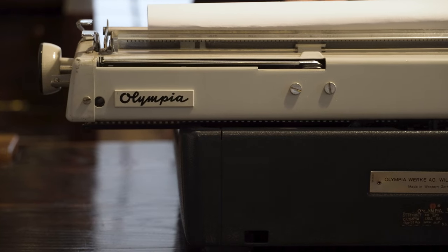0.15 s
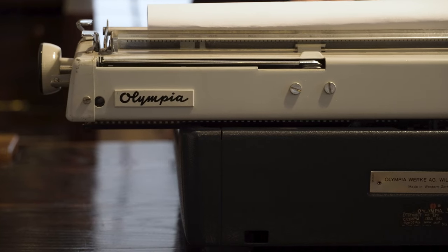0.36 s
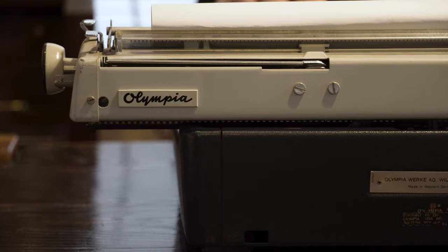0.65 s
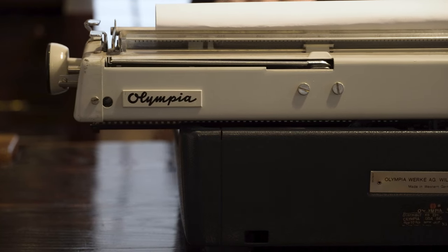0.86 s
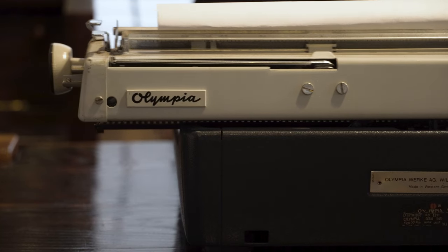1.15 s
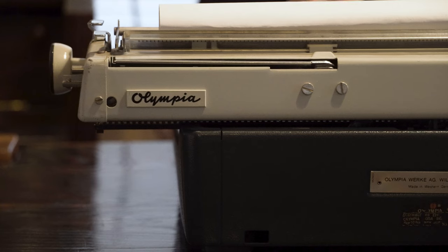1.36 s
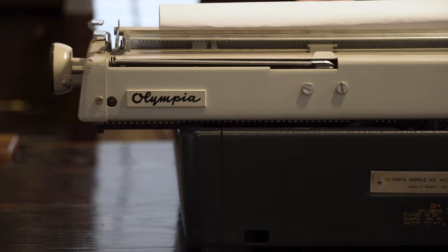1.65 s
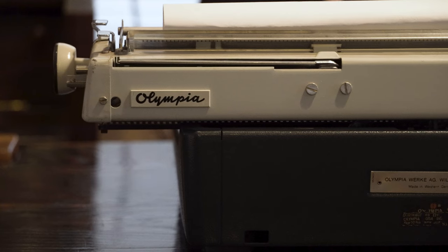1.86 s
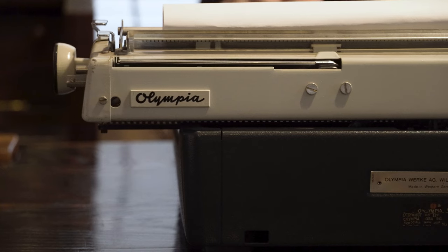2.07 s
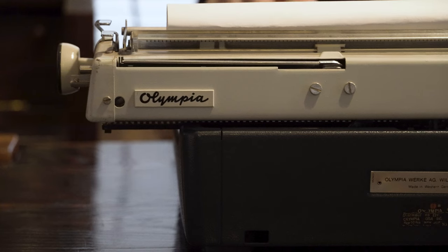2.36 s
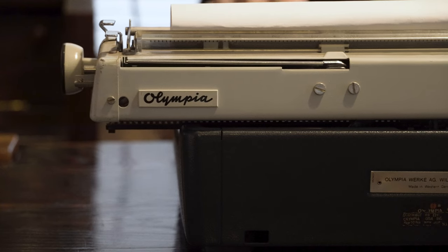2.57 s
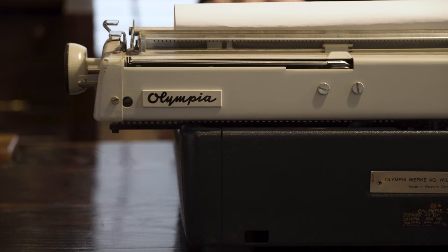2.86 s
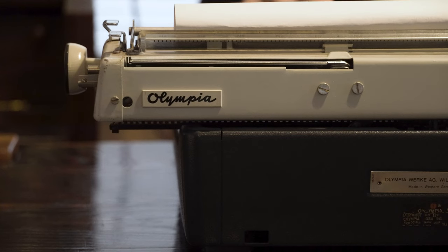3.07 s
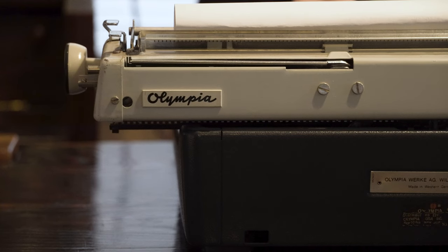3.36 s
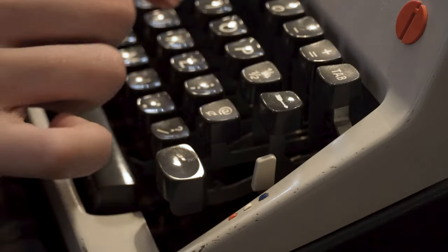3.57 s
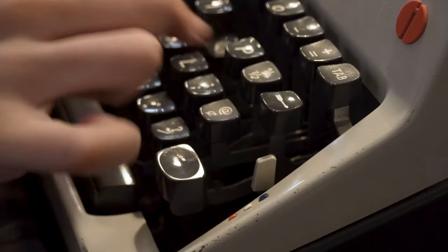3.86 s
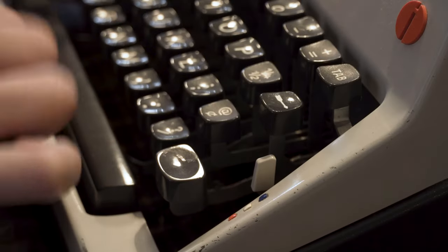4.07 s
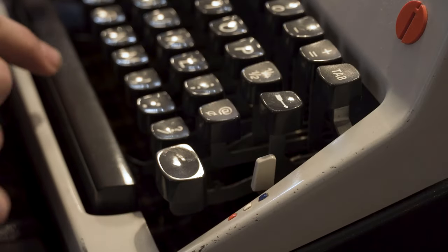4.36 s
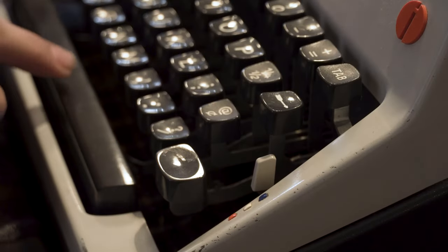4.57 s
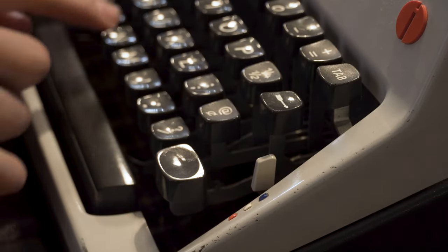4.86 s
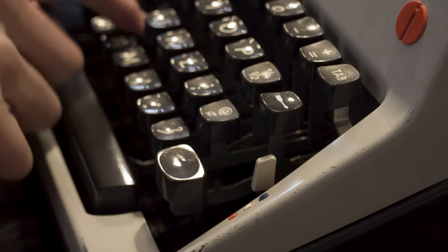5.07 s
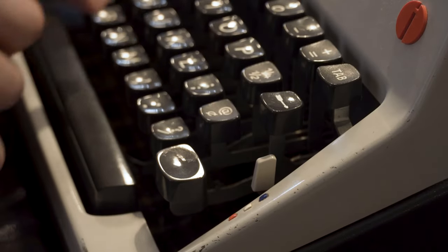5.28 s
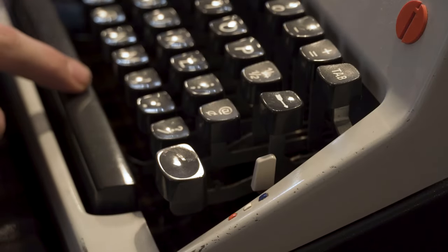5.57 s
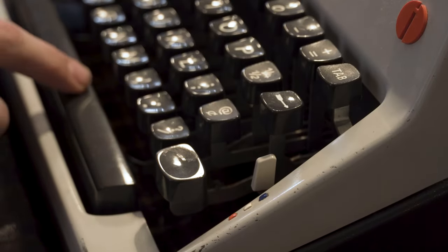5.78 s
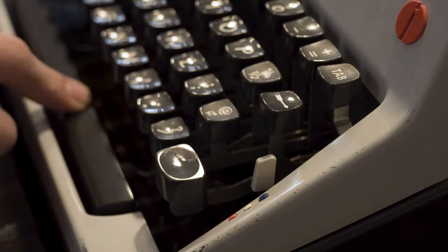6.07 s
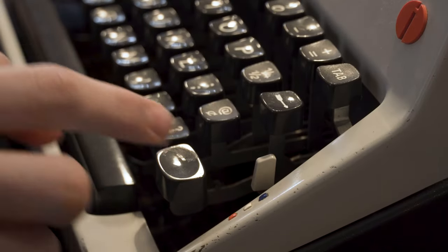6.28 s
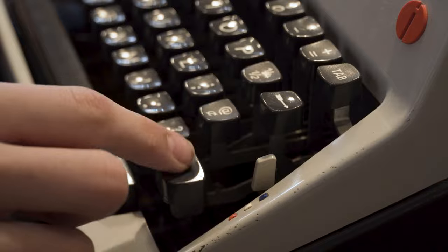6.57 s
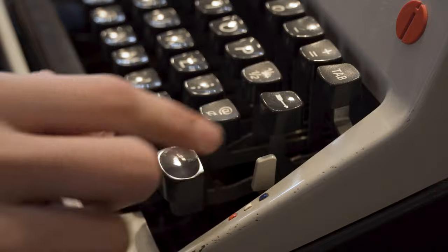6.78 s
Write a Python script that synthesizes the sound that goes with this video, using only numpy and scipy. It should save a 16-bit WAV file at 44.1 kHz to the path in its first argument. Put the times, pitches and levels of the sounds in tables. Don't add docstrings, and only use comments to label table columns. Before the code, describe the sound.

Steady run of cracking typewriter strokes with metallic ticks and deep desk thumps, cutting to scattered crisp key clacks heard close up in stereo.

```python
import sys
import numpy as np
from scipy import signal
from scipy.fft import rfft, irfft, next_fast_len
from scipy.io import wavfile
from scipy.ndimage import uniform_filter1d

SR = 44100
rng = np.random.default_rng(int(sys.argv[2]) if len(sys.argv) > 2 else 0)


def wrap_up_sound(samples):
    columns = np.atleast_2d(samples).T
    tamed = np.clip(columns, -1, 1)
    steps = np.round(tamed * 32767).astype(np.int16)
    wavfile.write(sys.argv[1], SR, steps)


def volts(x):
    e = np.asarray(x, float) / 20
    return 10 ** e


N = 305172
CUT_S = 3.586
CUT = round(CUT_S * SR)


def unit(x):
    return x / np.sqrt(np.mean(x ** 2) + 1e-20)


def along(points, hz):
    f, v = np.transpose(points)
    return np.interp(np.log(hz + 1), np.log(f + 1), v)


def curves(rows):
    s, *cols = np.transpose(rows)
    return [np.interp(np.arange(N) / SR, s, c) for c in cols]


def filtered(x, response):
    m = next_fast_len(x.shape[-1] + 8192)
    spectrum = rfft(x, m) * response(np.fft.rfftfreq(m, 1 / SR))
    return irfft(spectrum, m)[..., :x.shape[-1]]


def coloured(x, points):
    return filtered(x, lambda f: volts(along(points, f)))


def resonant(modes):
    def response(f):
        total = 0
        for k, (hz, width_hz, db) in enumerate(modes):
            damping = 1j * f * width_hz
            total = total + (-1) ** k * volts(db) * damping / (hz * hz - f * f + damping)
        return total
    return response


def band(x, lo_hz, hi_hz, order=2):
    edges_hz = [lo_hz, min(hi_hz, SR / 2 - 1)]
    return signal.sosfilt(signal.butter(order, edges_hz, "band", fs=SR, output="sos"), x)


def noise(size=N):
    return rng.standard_normal((2, size))


def add(track, s, x):
    at = round(s * SR)
    track[:, max(at, 0):max(at + x.shape[-1], 0)] += x[:, max(-at, 0):max(N - at, 0)]


# pitch_hz, level_db_per_hz
AIR = [(15, -43.5), (25, -23), (120, -1.5), (263, -5.5), (335, -1.5), (384, -4), (476, -6.5), (516, -15.5),
       (575, -4.5), (734, -19.5), (818, -12.5), (1130, -20), (16000, -39.5)]
# pitch_hz, level_db
DESK_HUSH = [(500, 2.5), (3000, 6), (10000, -15)]
# pitch_hz, level_db
HUM = [(59.2, -56.5), (129.2, -57.5), (253.0, -51.5), (414.5, -56.5)]
# time_s, level_db
RUSTLE = [(4.7, -72), (4.78, -49.5), (4.82, -47), (4.95, -61), (5.1, -77), (5.3, -74)]


def air():
    t = np.arange(N) / SR
    hush = volts(-45.5) * unit(coloured(noise(), AIR))
    hush = np.where(t < CUT_S, coloured(hush, DESK_HUSH), hush)
    hum = sum(volts(db) * unit(filtered(noise(), resonant([(hz, 6.0, 0)]))) for hz, db in HUM)
    sliding = (t > RUSTLE[0][0]) & (t < RUSTLE[-1][0])
    return hush + hum + volts(curves(RUSTLE)[0]) * sliding * unit(band(noise(), 690, 2900))


def room(x):
    t = np.arange(SR // 2) / SR
    tail = noise(size=len(t)) * volts(-60 * t / 0.42)
    tail = tail / np.linalg.norm(tail[0])
    return signal.fftconvolve(band(x, 200, 8700, order=1), tail, axes=1)[:, :N]


# pitch_hz, width_hz, level_db
CASE = [(132, 15.6, 2.5), (166.3, 12, 3.5), (205, 32, -2), (257, 46, -6)]
# pitch_hz, width_hz, level_db
CASE_NEAR = [(116.9, 21, 3), (203.3, 35, -5.5)]
# top_s, level_db, pitch_hz
BOOMS = [(0.011, -17, 159.0), (0.099, -14.5, 163), (0.226, -40, 102.0), (0.326, -24.5, 154.6),
         (0.386, -21, 162), (0.497, -17.5, 137.0), (0.6, -19, 165), (0.721, -19.5, 132.0),
         (0.851, -17.5, 165), (1.103, -27.5, 200), (1.209, -23, 171.7), (1.262, -34, 170.5),
         (1.385, -26, 205.0), (1.444, -25, 165), (1.505, -30, 101), (1.575, -16.5, 127.6),
         (1.695, -22.5, 164.0), (1.788, -16.5, 129.0), (1.883, -23.5, 167.0), (1.96, -22.5, 168),
         (2.098, -15.5, 131.7), (2.265, -15, 104), (2.42, -23.0, 161.0), (2.497, -15.0, 130),
         (2.6, -20.5, 124.5), (2.762, -18.5, 194.4), (2.874, -17.5, 159), (2.977, -16.5, 126.5),
         (3.077, -24, 163), (3.15, -29.5, 124.4), (3.211, -16.5, 128.3), (3.366, -26, 158),
         (3.451, -18.5, 192), (3.522, -25, 158.3), (3.582, -28, 174), (3.63, -32.5, 188.0),
         (3.722, -25.0, 121.5), (3.894, -33.5, 201), (3.986, -26.5, 119), (4.057, -37, 112),
         (4.114, -30, 128), (4.172, -34, 113.0), (4.255, -26.5, 119), (4.32, -29.5, 110.0),
         (4.502, -32.5, 122), (4.573, -41, 194), (5.452, -33, 171), (5.543, -30, 121.0),
         (5.615, -30.5, 113.4), (5.761, -29, 118.0), (5.878, -34, 128.8), (6.467, -21.5, 123),
         (6.601, -18.5, 123)]


def booms():
    tone, spread, t = np.zeros((2, N)), np.zeros((2, N)), np.arange(SR // 4) / SR
    rise_s = 0.02187
    for top_s, db, hz in BOOMS:
        swell = volts(db) * (t / rise_s) * np.exp(1 - t / rise_s)
        add(tone, top_s - rise_s, swell * np.sin(2 * np.pi * (hz * t + rng.random((2, 1)))))
        add(spread, top_s - rise_s, swell * np.ones((2, 1)))
    through_desk = unit(filtered(noise(), resonant(CASE)))
    by_keys = unit(filtered(noise(), resonant(CASE_NEAR)))
    others = np.where(np.arange(N) < CUT_S * SR, through_desk, by_keys)
    return volts(-2) * tone + volts(-5.5) * spread * band(others, 90, 340)


# time_s, pitch_hz, level_db
ROCK = [(0.0, 23.56, -21), (1.09, 23.36, -14.5), (1.39, 22.96, -28), (1.5, 22.24, -13.5),
        (1.74, 20.8, -14.5), (2.08, 22.3, -12.5), (2.34, 22.1, -18), (2.55, 20.4, -14.5), (2.92, 21.0, -19),
        (2.99, 22.4, -16), (3.58, 21.7, -15.5)]
# time_s, level_db
SHAKE = [
    [(0.0, -24), (0.15, -25), (0.3, -38), (0.43, -27), (1.05, -25), (1.24, -45), (1.47, -33), (1.51, -24.5),
     (3.53, -25.5), (3.58, -28)],
    [(3.6, -33), (3.66, -43), (4.25, -41), (4.27, -36), (5.08, -67.5), (5.78, -36), (6.39, -61),
     (6.46, -35), (6.92, -43)],
]
# pitch_hz, level_db_per_hz
SHUDDER = [(20, -1.5), (30, 2.5), (45, -2), (70, -1.5), (95, -3.5), (130, -46)]


def desk(gain_db):
    hz, db = curves(ROCK)
    turn = 2 * np.pi * np.cumsum(hz) / SR
    peaked = np.sin(turn) + 0.25 * np.cos(2 * turn)
    swing = volts(db + 6 + 0.75 * gain_db) * peaked * (np.arange(N) < CUT_S * SR)
    shake_db = curves([*SHAKE[0], *SHAKE[1]])[0]
    shudder = volts(shake_db + 1 + 0.17 * gain_db) * unit(coloured(noise(), SHUDDER))
    return swing + shudder + booms()


# start_s, level_db, pitch_hz, t60_s
PINGS = [(.127, -23, 12900, .04), (0.303, -22.5, 14200, 0.037), (0.517, -20, 3290, .05),
         (0.586, -12, 8340, 0.034), (.707, -10, 14300, .04), (1.077, -18.5, 3190, 0.045),
         (1.076, -24, 8700, 0.051), (1.363, -8.5, 3140, .06), (1.362, -23, 6540, 0.13),
         (1.597, -23, 4750, 0.11), (1.882, -17, 4660, 0.037), (2.164, -23, 4700, 0.058),
         (2.447, -28, 4450, 0.044), (2.447, -22, 6490, 0.031), (2.776, -20, 4740, 0.041),
         (3.247, -16.5, 4740, .1), (4.139, -24, 3260, 0.059), (4.735, -46, 2200, 0.11),
         (5.097, -45, 2100, 0.12), (5.435, -25, 3240, 0.11), (5.435, -28, 4600, 0.065),
         (5.625, -19, 3230, .04), (6.408, -21, 4350, 0.056), (6.41, -19, 672, .15),
         (6.567, -15.5, 672, 0.12), (6.205, -53, 2130, .2)]


def pings(gain_db):
    out, t = np.zeros((2, N)), np.arange(SR // 5) / SR
    for s, db, hz, t60_s in PINGS:
        size = volts(db - gain_db[round(s * SR)] - 60 * t / t60_s) * (1 - np.exp(-t / 0.00091))
        add(out, s, size * np.sin(2 * np.pi * (hz * t + rng.random((2, 1)))))
    return out


# pitch_hz, width_hz, level_db
FRAME = [(302.5, 42, -7), (398, 27, -3.5), (452, 14.5, -11.5), (672, 68, -2), (875, 60, -10),
         (1120, 13, -10.5), (1182, 20.6, -12), (1543, 45, -18), (2116, 90, -11.5), (2900, 63, -19)]
# start_s, level_db, t60_s
KNOCKS = [(0.074, -2.5, 0.069), (0.304, -17.5, 0.33), (0.338, -15, 0.094), (0.488, -16, 0.11),
          (0.553, -14.5, 0.069), (0.588, -36, 0.11), (0.664, -7.5, 0.13), (0.824, -8.5, 0.16),
          (1.077, -25, 0.33), (1.34, -26, 0.17), (1.361, -18, 0.21), (1.392, -20, 0.069),
          (1.543, -31, 0.067), (1.56, -18, 0.26), (1.643, -23.5, 0.12), (1.777, -19.5, 0.26),
          (1.874, -19.5, 0.3), (1.906, -13, 0.069), (2.123, -18.5, 0.23), (2.206, -12.5, 0.33),
          (2.386, -8, 0.056), (2.434, -13.5, 0.36), (2.573, -5.5, 0.082), (2.753, -19, 0.097),
          (2.801, -15.5, 0.27), (2.964, -14.5, 0.1), (3.019, -16, 0.15), (3.182, -26.5, 0.082),
          (3.199, -15.5, 0.1), (3.267, -15, 0.14), (3.316, -47, 0.075), (3.433, -18, 0.12),
          (3.459, -20, 0.1), (3.582, -24.5, 0.18), (3.61, -30, 0.12), (3.686, -27.5, 0.25),
          (3.807, -22, 0.19), (4.087, -13, 0.044), (4.138, -24, 0.21), (4.176, -22.5, 0.12),
          (4.216, -24.5, 0.066), (4.328, -25, 0.16), (4.49, -20, 0.091), (5.435, -26, 0.24),
          (5.633, -22.5, 0.099), (5.689, -24, 0.12), (5.862, -20, 0.11), (6.404, -16, 0.085),
          (6.409, -13, 0.36), (6.565, -5, 0.098)]


def knocks(gain_db):
    rattle, t = np.zeros((2, N)), np.arange(SR // 4) / SR
    for s, db, t60_s in KNOCKS:
        decay = volts(db - gain_db[round(s * SR)] - 60 * t / max(t60_s, 0.01))
        add(rattle, s, decay * (1 - np.exp(-t / 0.0012)) * noise(size=len(t)))
    return volts(15) * filtered(rattle, resonant(FRAME)) + volts(4) * band(rattle, 210, 1290)


# start_s, level_db, lower_band_db
TICKS = [(0.0747, -21, -4), (0.0837, -23.5, -1), (0.0924, -18.5, 2), (0.1052, -27, -14.5),
         (0.1284, -35, -19), (0.1355, -10, -32.5), (0.1535, -22, -23), (0.1724, -29, -28.5),
         (0.1914, -38, -13), (0.2114, -45, -1), (0.3013, -6, -11), (0.3292, -1, -12.5), (0.3715, -14, -1),
         (0.475, -19, -3), (0.4878, -10, -9), (0.4955, -12, -10.5), (0.5142, -12.5, -3), (0.5324, -11, -16),
         (0.541, -4, -15), (0.5624, -14, -1), (0.5866, -19, -22), (0.6629, -30, -10), (0.6813, -18, 1),
         (0.6997, -9.5, -6), (0.7053, -10.5, -16.5), (0.7133, -8.5, -13), (0.7247, -12, -9),
         (0.7354, -5.5, -13.5), (0.7754, -20, -9), (0.845, -21, -6), (0.8558, -17, -4), (0.8854, -6, -15),
         (0.9574, -26, -5), (1.0394, -27, -17), (1.037, -15, -20), (1.0731, -8.5, -11.5), (1.1194, -32, -8),
         (1.1642, -35, -9), (1.1764, -37, -2), (1.1848, -32, 3.5), (1.2024, -29, 3), (1.226, -32, 3.5),
         (1.2434, -36, -5), (1.263, -31, -19), (1.3437, -29, -2), (1.3606, -5, -11), (1.3891, -0.5, -8.5),
         (1.5334, -21, -8), (1.5508, -19, -10), (1.5618, -18, 1), (1.5742, -9, -2.5), (1.594, -5.5, -9),
         (1.6344, -3, -9), (1.6577, -19, -11), (1.7394, -19.5, -3), (1.785, -11.5, -12), (1.831, -12.5, -7),
         (1.8678, -13, -10), (1.8926, -11, -14), (1.906, -1, -7.5), (2.0298, -30, -6), (2.0663, -13, -7),
         (2.0811, -8, -8.5), (2.0984, -12, -6), (2.121, -13, -16), (2.1558, -9.5, -8.5),
         (2.193, -5.5, -6.5), (2.2644, -15, -3), (2.2917, -5.5, -20), (2.3352, -14, -7), (2.379, -14, -4),
         (2.387, -12.5, -6), (2.43, -42, -8), (2.4473, -44, -15.5), (2.4663, -7.5, -5), (2.4984, -23, -11),
         (2.5716, -31, -1), (2.5841, -28, -5), (2.593, -31, -2), (2.6058, -16, -2), (2.6786, -35, 3),
         (2.7517, -8.5, -6), (2.7767, -12.5, -6.5), (2.799, -2, -39), (2.9567, -21, -15.5),
         (2.9643, -21.5, 3), (2.9743, -15, -3), (2.9973, -20, 1), (3.015, -6, -14), (3.03, -4.5, -4.5),
         (3.1421, -23, -3), (3.1634, -26, -7), (3.1889, -20, -8), (3.2058, -10, -9), (3.246, -8.5, -6.5),
         (3.2797, -2, -19), (3.4262, -16, -2), (3.4593, -5, -8), (3.6014, -17, -7), (3.606, -7.5, -13),
         (3.6272, -8, -7), (3.638, -3, -16), (3.7504, -17, -8), (3.7999, -15.5, -7), (3.8587, -12, -10),
         (3.8826, -13, -17), (3.903, -2, -15), (4.0227, -17, -8), (4.0707, -16.5, -10), (4.084, -15, -13),
         (4.138, -5, -16.5), (4.1702, -0.5, -25), (4.2163, -10, -18), (4.3271, -14.5, -5.5),
         (4.488, -29, -10), (5.219, -24, -29), (5.2465, -23, -31), (5.435, -13, -10.5), (5.465, -5, -21),
         (5.5114, -16, -13), (5.579, -13, -9), (5.6297, -12.5, -9), (5.681, -3, -21), (5.7994, -20, -12),
         (5.8124, -18, -12), (5.8536, -15, -14), (5.8694, -14, -21), (6.4, -34, 5), (6.4086, -20, 4),
         (6.4406, -11.5, -25), (6.5733, -13.5, -7), (6.6, -27, 6)]


def ticks(gain_db):
    bright, lower, t = np.zeros((2, N)), np.zeros((2, N)), np.arange(SR // 12) / SR
    for s, db, lower_db in TICKS:
        length_s = 0.0093 * volts(0.31 * db)
        scrape = np.exp(-(t / length_s) ** 3)
        scrape = scrape + volts(-0.5 - 60 * t / 0.0041) + volts(-9.5 - 60 * t / 0.15)
        size = volts(db - 7.5 - gain_db[round(s * SR)]) * scrape * (1 - np.exp(-t / 0.00032))
        add(bright, s, size * noise(size=len(t)))
        add(lower, s, volts(lower_db) * size * noise(size=len(t)))
    colour = [(4000, -14), (6000, -7), (9000, -3), (11000, -8.5), (14000, -1.5), (16000, -11)]  # Hz, dB
    return volts(-1.5) * coloured(bright, colour) + volts(7.5) * band(lower, 1260, 5100)


# start_s, level_db, room_db, duck_db
SLAPS = [(0.3406, -4.5, -16, 9), (0.5545, -6.5, -19.5, 11.5), (0.7433, -7.5, -15, 5),
         (0.8927, -11, -14.5, 5), (1.3987, -5.5, -18.5, 19), (1.6455, -5.5, -18.5, 18.5),
         (1.914, -5.5, -19, 19.5), (2.208, -6.5, -17.5, 7.5), (2.4856, -9.5, -20, 1.5),
         (2.8103, -9, -14, 6), (3.0384, -7.5, -17, 17), (3.2862, -6, -17, 15.5), (3.47, -4.5, -16.5, 10.5),
         (3.6469, -10, -20.5, 19.5), (3.9143, -12.5, -18.5, 22), (4.1813, -7.5, -18.5, 15.5),
         (5.477, -11, -18.5, 20.5), (5.6966, -8.5, -19, 13), (6.4266, -9.5, -18.5, 8)]
# earlier_s, level_db, room_db, duck_db
EARLIER = (0.3, -1, -12, 16.5)


def every_slap():
    return [(-EARLIER[0], *EARLIER[1:]), *SLAPS]


def ducking():
    t, gain_db = np.arange(N) / SR, np.zeros(N)
    for s, _, _, duck_db in every_slap():
        since_s = t - s + 0.00155
        live = (since_s > 0) & ((s > CUT_S) | (t < CUT_S))
        held = 0.86 * np.exp(-np.abs(since_s) / 0.14) + 0.27 * np.exp(-(since_s / 0.012) ** 2)
        gain_db = np.minimum(gain_db, -duck_db * held * live)
    return uniform_filter1d(gain_db, size=30)


# pitch_hz, level_db_per_hz
SLAP = [(300, -24.5), (1200, -10), (3000, 3.5), (5000, 2.5), (8000, 3), (11000, -9.5), (15500, -12.5)]
# pitch_hz, level_db_per_hz
ANSWER = [(180, -18.5), (300, 5.5), (603, -14), (885, -5.5), (1390, -12), (1480, -1.5), (1720, -4.5),
          (1870, -2.5), (2170, -7), (3400, -5.5), (3830, -6), (6200, -3), (8220, -8), (15000, -26),
          (16000, -34)]
# pitch_hz, level_db
NEAR = [(3000, 1.5), (8000, 1), (11000, 8), (15500, 20)]
# pitch_hz, t60_s
ROOM = [(300, 0.47), (1500, 0.54), (5000, 0.47), (9000, 0.39), (15000, 0.17)]


def slaps():
    out, t = np.zeros((2, N)), np.arange(SR // 20) / SR
    shape = volts(-60 * t / 0.0052) + volts(-4.5) * np.exp(-(t / 0.0042) ** 4)
    for s, db, room_db, duck_db in every_slap():
        crack = unit(coloured(noise(size=len(t)), SLAP)) * shape
        add(out, s, volts(db + duck_db - 2) * crack)
        hz, frame_s, z = signal.stft(noise(size=SR), SR, nperseg=256)
        colour_db = along(ANSWER, hz) + along(NEAR, hz) * (s > CUT_S)
        decay_db = -60 * frame_s / along(ROOM, hz)[:, None]
        tail = signal.istft(z * volts(colour_db[:, None] + decay_db), SR, nperseg=256)[1]
        onset = 1 - np.exp(-np.arange(tail.shape[1]) / SR / 0.0052)
        tail = tail / np.std(tail[:, :SR // 20]) * onset
        add(out, s, volts(db + duck_db + room_db) * tail)
    return out


# pitch_hz, correlation
ALIKE = [(60, 0.98), (180, 0.96), (550, 0.9), (1650, 0.56), (4970, 0.33), (15000, 0.42)]
# pitch_hz, level_db
LEAN = [(60, -4), (240, 0), (950, -1.5), (3770, -1), (15000, -4)]


def stereo_pair(x):
    def mid_side(hz):
        turn = np.arccos(np.clip(along(ALIKE, hz), 0, 1)) / 2
        return np.array([np.cos(turn), np.sin(turn)])
    mid, side = filtered(x, mid_side)
    halves = np.array([[0.5], [-0.5]])
    return filtered(np.array([mid + side, mid - side]), lambda hz: volts(along(LEAN, hz) * halves))


def scene():
    gain_db = ducking()
    small = ticks(gain_db) + knocks(gain_db)
    small[:, CUT:CUT + 650] *= volts(-20)
    loud = volts(gain_db) * slaps()
    loud[:, CUT:round(SLAPS[13][0] * SR) - 40] *= volts(-18)
    quiet = volts(gain_db) * (small + volts(-4.5) * room(small) + pings(gain_db) + air())
    ports = quiet + loud
    first = np.arange(N) < CUT_S * SR
    return np.where(first, ports[0], stereo_pair(ports * ~first)) + desk(gain_db)[0]


def band_limit(x):
    return signal.sosfilt(signal.butter(12, 16670, fs=SR, output="sos"), x)


def record(dry):
    clipped = dry / (1 + np.abs(dry / 0.8) ** 6) ** (1 / 6)
    limited = coloured(clipped, [(15700, -0.5), (16100, -24), (17000, -27)])
    return band_limit(limited)


dry = scene()
out = record(dry)
wrap_up_sound(out)
```